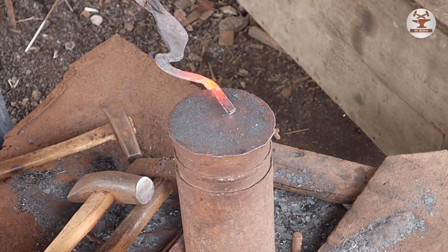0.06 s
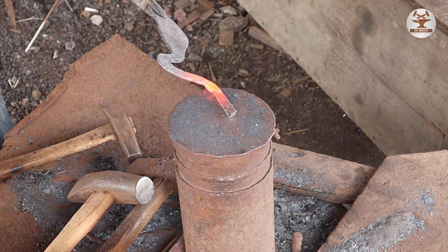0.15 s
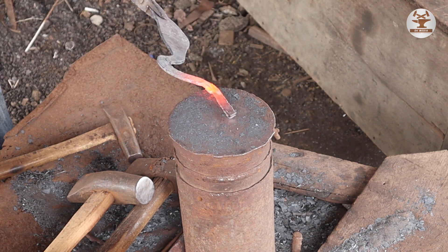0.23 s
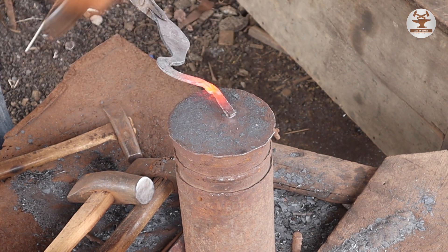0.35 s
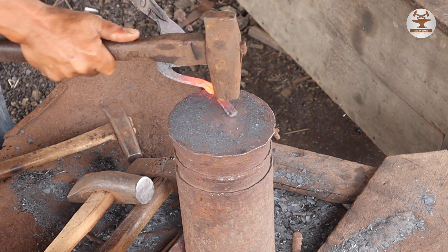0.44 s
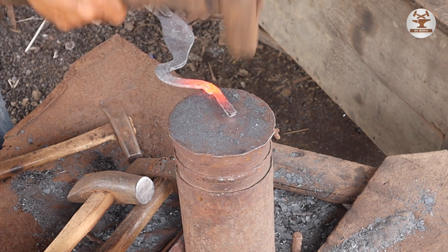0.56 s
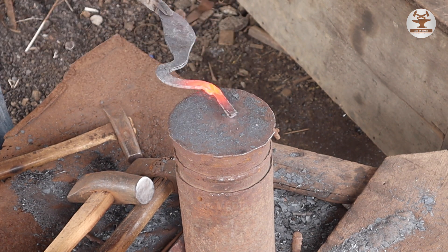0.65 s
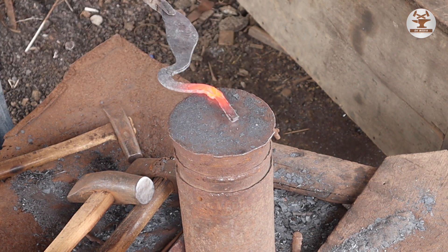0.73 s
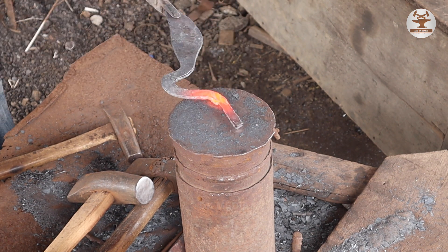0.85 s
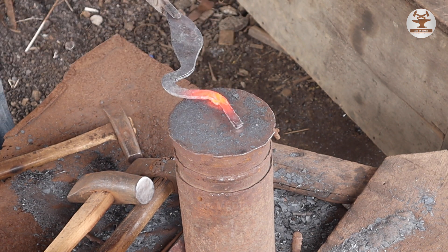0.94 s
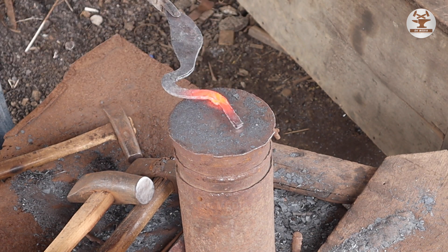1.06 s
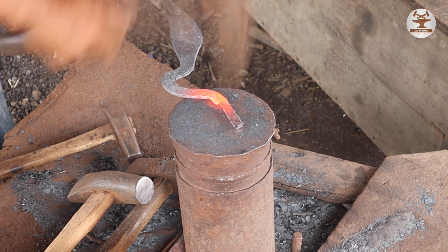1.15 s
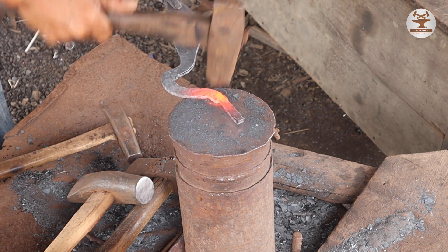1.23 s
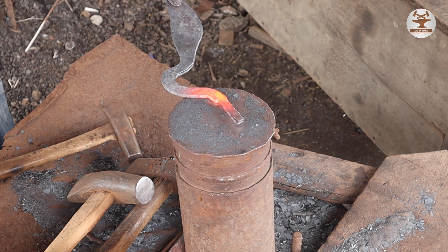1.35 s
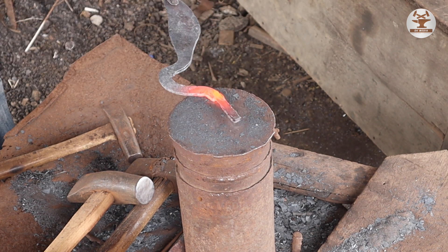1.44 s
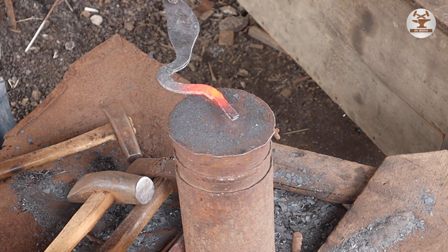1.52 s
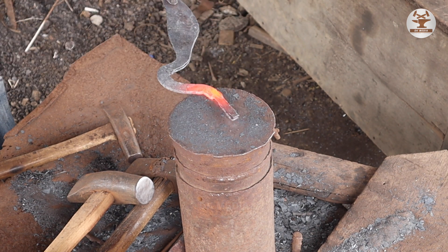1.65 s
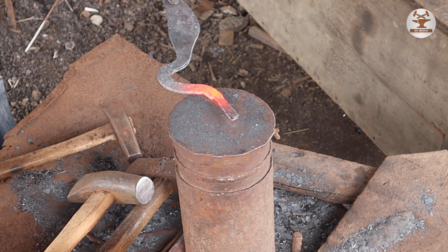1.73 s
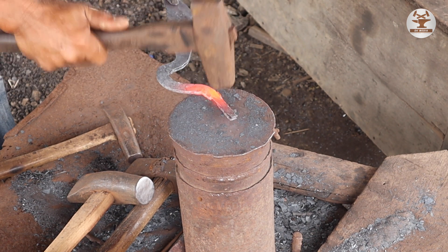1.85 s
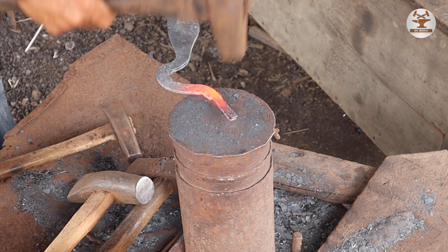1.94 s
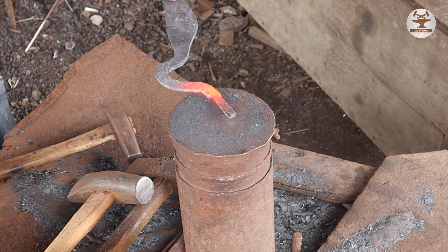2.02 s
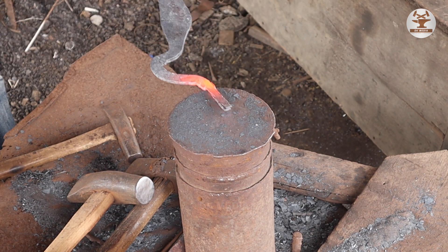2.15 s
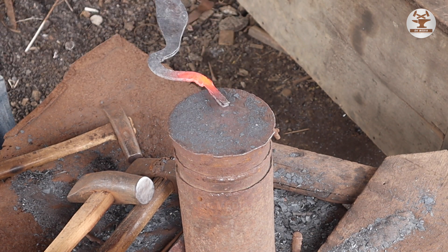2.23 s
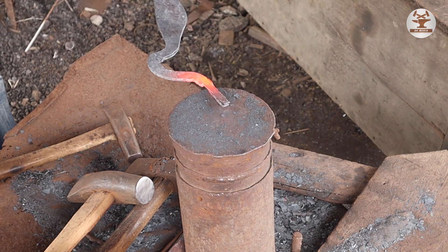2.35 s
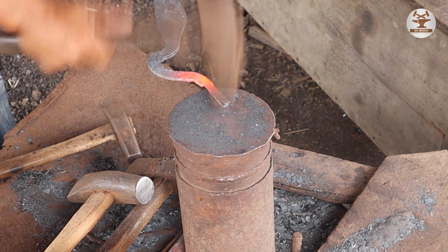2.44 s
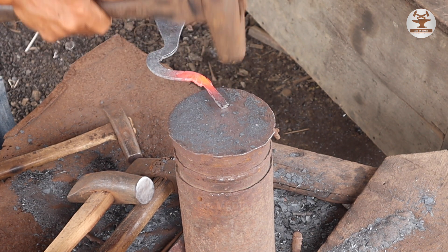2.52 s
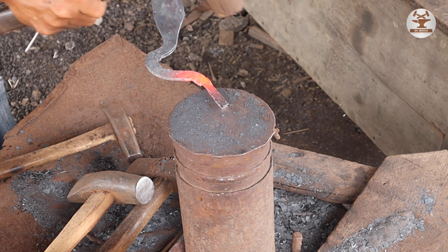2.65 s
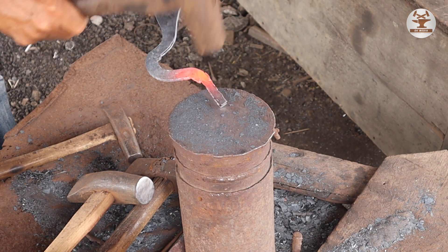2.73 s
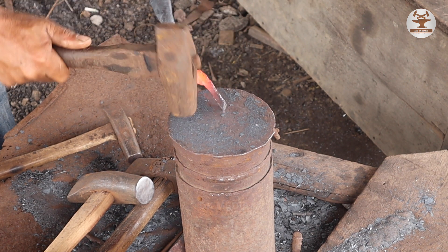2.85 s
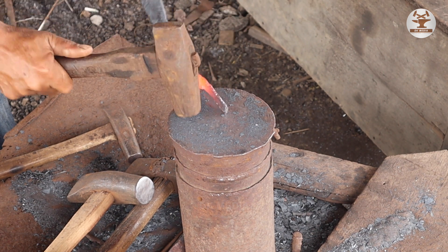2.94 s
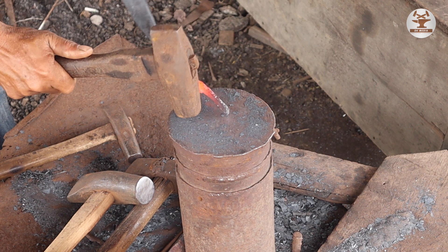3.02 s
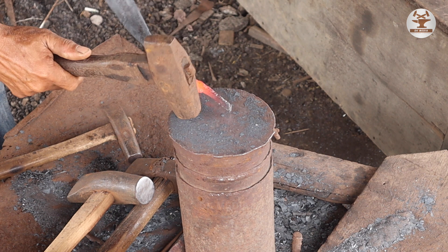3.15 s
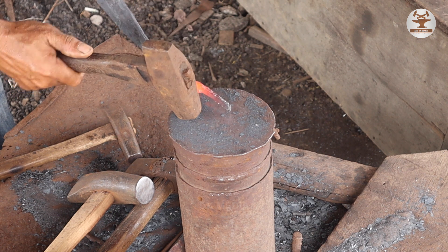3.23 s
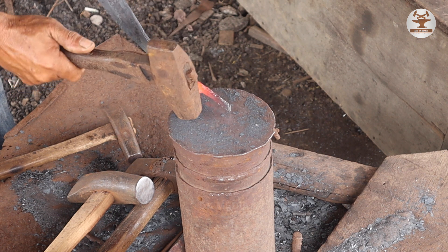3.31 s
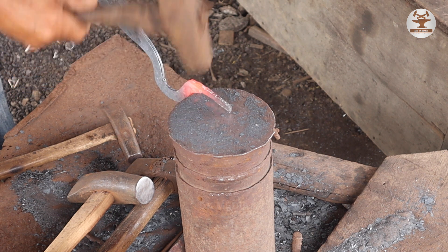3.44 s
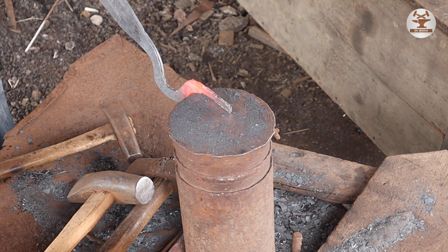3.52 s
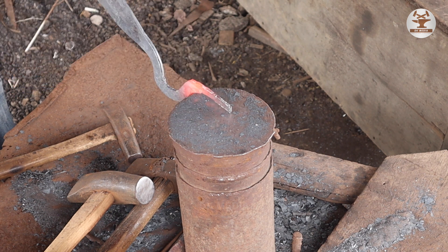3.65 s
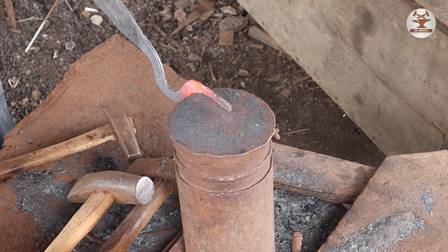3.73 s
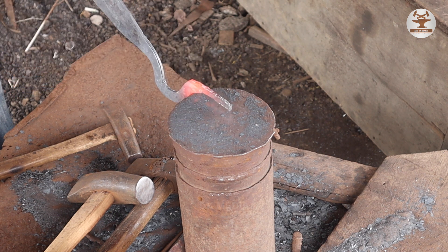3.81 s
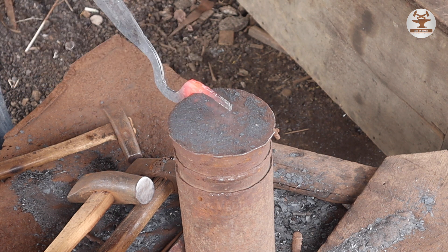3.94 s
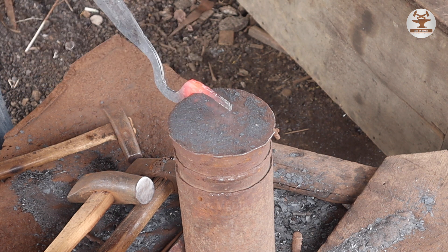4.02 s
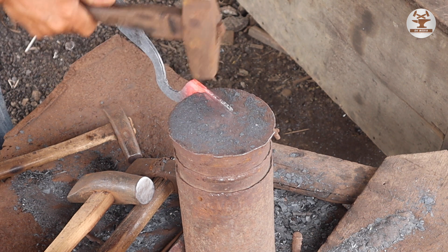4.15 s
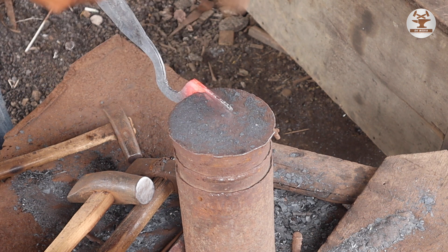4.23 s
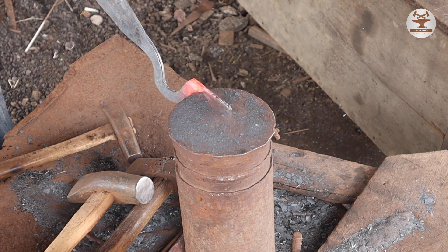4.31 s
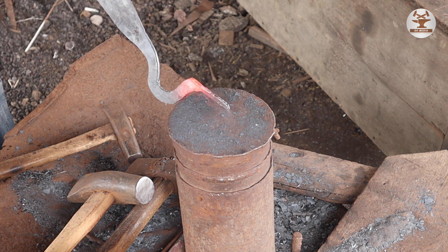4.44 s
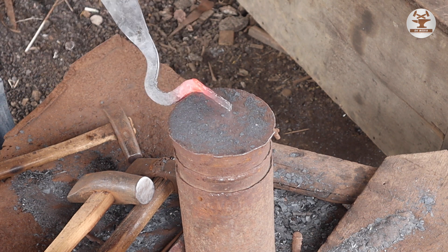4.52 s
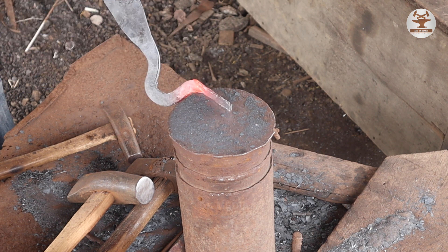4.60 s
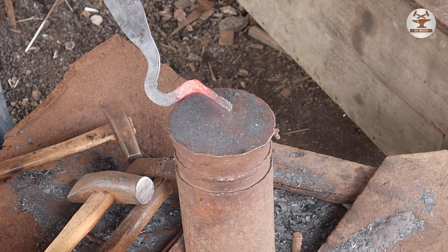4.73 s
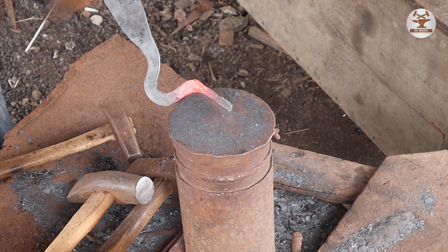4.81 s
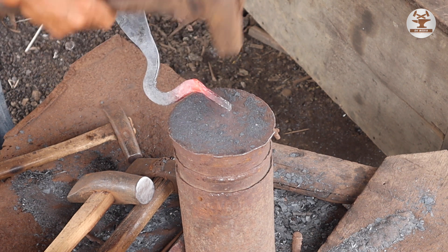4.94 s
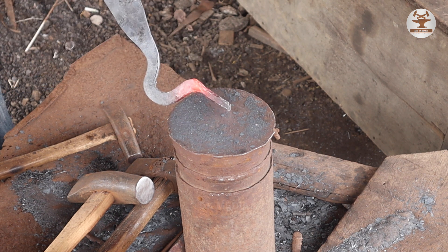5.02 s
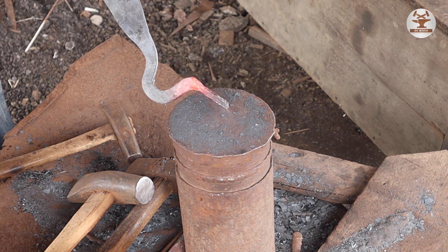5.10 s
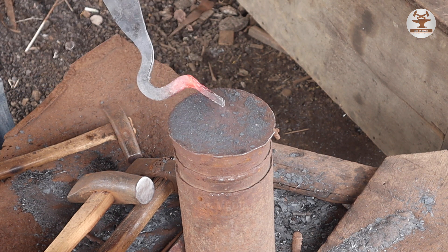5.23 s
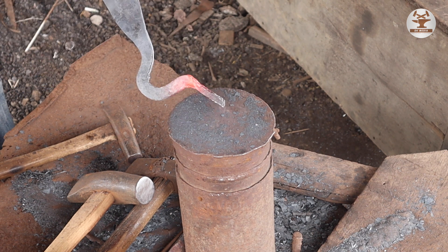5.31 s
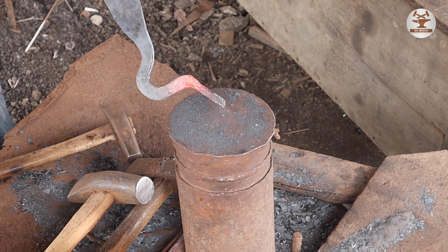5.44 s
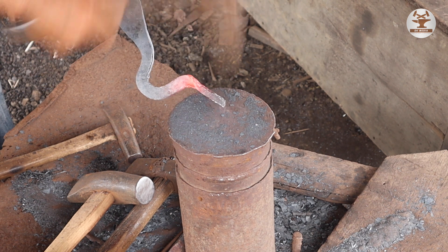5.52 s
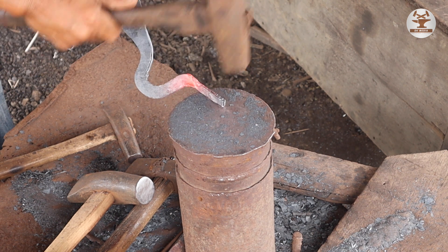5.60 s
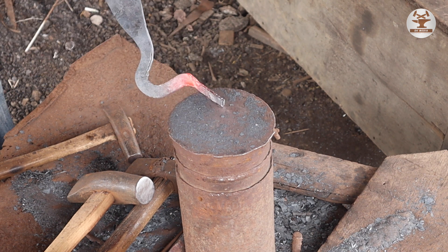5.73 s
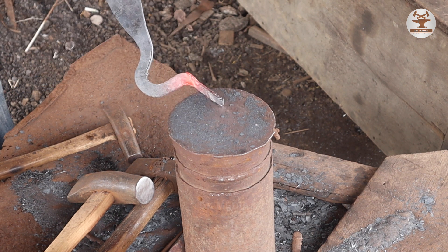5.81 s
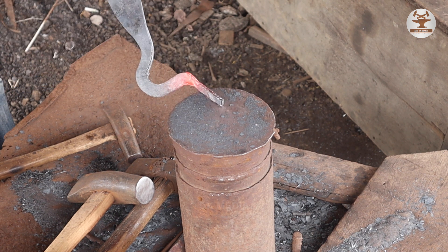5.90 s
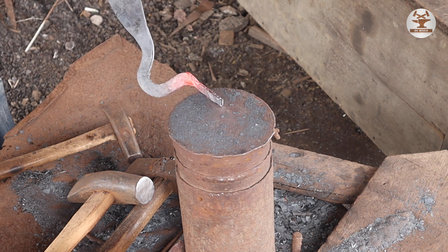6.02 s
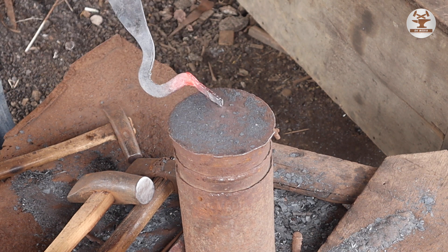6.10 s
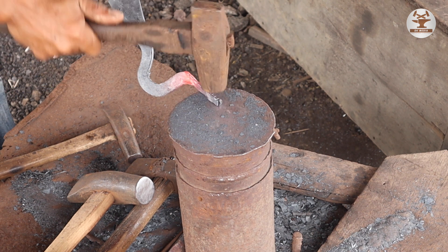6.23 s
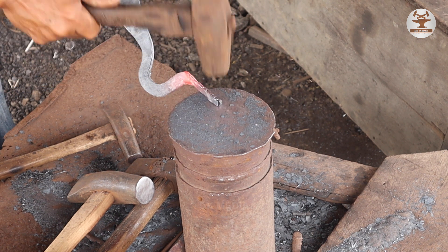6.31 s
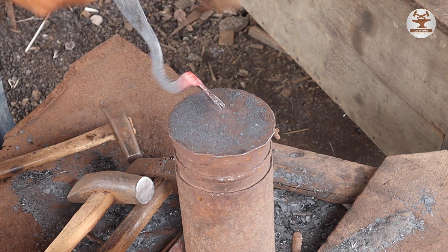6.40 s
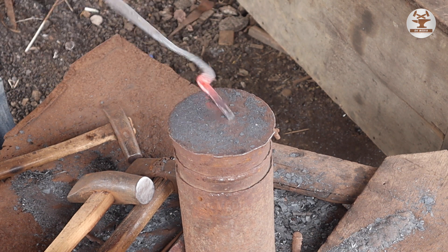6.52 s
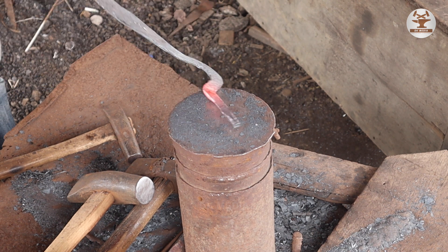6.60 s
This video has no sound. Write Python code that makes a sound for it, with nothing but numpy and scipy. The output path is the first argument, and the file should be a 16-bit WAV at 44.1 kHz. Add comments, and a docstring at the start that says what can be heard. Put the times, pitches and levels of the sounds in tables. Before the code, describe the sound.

A hand hammer strikes a hot steel bar on a small post anvil, close by under an open shed. Four blows land at about 0.5, 1.2, 1.9 and 2.5 seconds, each a crisp crack and thud. The first is fairly dull, while the later ones clank brighter and ring briefly. At 2.9 seconds the hammer drops lightly on the bare anvil and bounces in a quick, ringing double tap. After a pause, a soft, dull blow lands at 4.1 seconds, followed by firm, thudding strikes at 4.9, 5.6 and 6.2 seconds. Each has a short echo, and the loudest peaks slightly overload the microphone. A faint low rumble and hiss continue underneath. Very faint, distant animal whimpers come around 1, 4.4 and 6.4 seconds, with a bird peep at 3.6 and a barely audible howl from 5 seconds. A soft rustle comes at the end.

```python
"""A smith's hand hammer draws out a red-hot bar on a small steel post anvil under an open shed.
Each blow crushes scale, thuds the post and, where it lands hard, clanks and leaves the steel ringing;
midway the hammer drops on the bare anvil and bounces. The shed answers briefly and the loudest
peaks overload the microphone. Outside, animals call faintly over a low rumble."""
import sys
import numpy as np
from scipy import signal
from scipy.fft import rfft, irfft
from scipy.io import wavfile
from scipy.ndimage import uniform_filter1d

SR = 44100
rng = np.random.default_rng(int(sys.argv[2]) if len(sys.argv) > 2 else 0)


def digitize_waveform(pressure):
    """Quantize a signal to 16-bit integers and store it at the path in sys.argv[1].

    Rows of a 2-D input are taken as channels; values are limited to [-1, 1].
    """
    field = np.atleast_2d(pressure).T
    bounded = np.clip(field, -1, 1)
    quanta = np.round(bounded * 32767).astype(np.int16)
    wavfile.write(sys.argv[1], SR, quanta)


N = 293706
T = np.arange(SR) / SR  # one second, the life of a blow


def undb(db):
    """Decibels to gain."""
    return 10 ** (np.asarray(db) / 20)


def add(out, start_s, sound):
    """Mix a sound in from a given time."""
    start = int(round(start_s * SR))
    sound, start = sound[max(-start, 0):], max(start, 0)
    out[start:start + len(sound)] += sound[:max(len(out) - start, 0)]


def filtered(sound, order, corner_hz, kind="low"):
    """Butterworth low-pass or high-pass."""
    return signal.sosfilt(signal.butter(order, corner_hz, kind, fs=SR, output="sos"), sound)


def fade(t60_s):
    """Exponential decay, one second long."""
    return np.exp(-np.log(1000) * T / t60_s)


def ring(modes):
    """Decaying sines of a struck body; neighbouring modes swing in opposite directions."""
    return sum((-1) ** k * undb(db) * fade(t60) * np.sin(2 * np.pi * hz * T)
               for k, (hz, db, t60) in enumerate(modes))


def radiate(modes, corner_hz):
    """A struck body sends out little sound below a corner set by its size."""
    return filtered(ring(modes), 2, corner_hz, "high")


def noise(colour, size):
    """Noise of rms 1, shaped by an EQ curve."""
    hz, db = np.transpose(colour)
    freq = np.maximum(np.fft.rfftfreq(size, 1 / SR), 1)
    eq = undb(np.interp(np.log(freq), np.log(hz), db))
    shaped = irfft(rfft(rng.standard_normal(size)) * eq, size)
    return shaped / shaped.std()


def wobble(size, smooth_samples):
    """Smooth random modulation with a standard deviation of 1."""
    drift = uniform_filter1d(rng.standard_normal(size), size=smooth_samples)
    return drift / drift.std()


def tail(bands, start_s, rise_s):
    """Diffuse reverb: half-octave bands of noise, each dying at its own rate."""
    hz, db, t60 = np.transpose(bands)
    freq, white = np.fft.rfftfreq(SR, 1 / SR), rfft(rng.standard_normal(SR))
    onset = np.clip((T - start_s) / rise_s, 0, 1)
    out = 0
    for low_hz in 45 * 2 ** np.arange(0, 8.6, .5):
        inside = (freq >= low_hz) & (freq < low_hz * np.sqrt(2))
        log_centre = np.log(freq[inside].mean())
        band_db, band_t60 = (np.interp(log_centre, np.log(hz), column) for column in (db, t60))
        band = irfft(white * inside, SR) * onset * fade(band_t60)
        out = out + band * undb(band_db) * np.sqrt(inside.mean() / np.sum(band ** 2))
    return out


def outdoors(level_db=-67, swell_db=3.2953):
    """The bed: faint hiss and a distant rumble that swells slowly."""
    # colour of the open air: freq_hz, level_db
    air_colour = [(15, -51), (25, -18), (69, 6.5), (107, -12), (140, 2), (193, -11.5), (260, -7.5),
                  (331, -17), (433, -16), (895, -20), (997, -21), (1340, -25.5), (1490, -25), (1750, -28),
                  (15500, -34)]
    swell = np.interp(np.arange(N), np.linspace(0, N, 24), rng.standard_normal(24))
    air = undb(level_db) * noise(air_colour, N)
    rumble = filtered(air, 2, 600)
    return air + rumble * (undb(swell_db * swell) - 1)


def call(length_s, aim_hz, partials_db, scoop=0, scoop_s=1, sag_hz_per_s=0,
         waver=.012, attack_s=.0057, release_s=.015):
    """An animal's wavering tone: it starts a share (scoop) below the pitch it aims at, and may sag."""
    t = np.arange(int(length_s * SR)) / SR
    pitch_hz = aim_hz * (1 - scoop * np.exp(-t / scoop_s)) - sag_hz_per_s * t
    pitch_hz *= 1 + waver * wobble(len(t), 300)
    phase = 2 * np.pi * np.cumsum(pitch_hz) / SR
    tone = sum(undb(db) * np.sin(k * phase) for k, db in enumerate(partials_db, 1))
    envelope = np.minimum(t / attack_s, 1) * np.minimum((length_s - t) / release_s, 1)
    return np.sqrt(2) * tone * envelope


def animals(hoarse_db=4.5):
    """Far whimpers, two bird notes and a long, hoarse falling howl, blurred by the yard."""
    # a small animal whimpering some way off: start_s, length_s, level_db
    whimpers = [(.705, 0.0407, -69), (.802, 0.0444, -68), (.872, 0.0354, -68), (.952, 0.105, -68),
                (1.125, 0.075, -70.5), (4.232, .05, -73.5), (4.298, 0.0368, -69), (4.379, 0.11, -68.5),
                (4.537, 0.0965, -69.5), (6.38, .05, -71), (6.465, 0.099, -71)]
    out = np.zeros(N)
    for start_s, length_s, level_db in whimpers:
        yelp = call(length_s, 1365.4, [-1.5], scoop=.5, scoop_s=.013, sag_hz_per_s=3300)
        add(out, start_s, undb(level_db) * yelp * fade(.8)[:len(yelp)])
    peep = call(.1497, 1334, [-25.5, -19, -.5, -21], scoop=.14, scoop_s=.02, sag_hz_per_s=440,
                waver=.006, attack_s=.0419, release_s=.0836)
    chirp = call(.032, 9800, [-1.5], scoop=.45, scoop_s=.054, attack_s=.012)
    howl = call(1.55, 847.6, [-1.5, -1], sag_hz_per_s=100, waver=.02, attack_s=.0774, release_s=.1076)
    howl *= undb(hoarse_db * wobble(len(howl), 1500))
    for start_s, level_db, sound in [(.32, -75, chirp), (3.64, -67.5, peep), (5.08, -82, howl)]:
        add(out, start_s, undb(level_db) * sound)
    yard_blur = tail([(491, -6, .35), (7060, -6.5, .19)], start_s=.0052, rise_s=.012)
    return out + signal.fftconvolve(out, yard_blur)[:N]


def shed():
    """Impulse response of the shed: direct sound, first echoes, resonances, scatter and the yard."""
    # short scatter under the roof, against the direct sound: freq_hz, level_db, t60_s
    scatter = [(101, -16.5, 0.28), (296, -11, 0.37), (680, -10, 0.15), (1506, -11.5, 0.19),
               (3500, -10.5, .14), (7000, -8.5, 0.14), (15000, -11, .12)]
    # late reverb from the yard, against the direct sound: freq_hz, level_db, t60_s
    yard = [(100, -19, 0.948), (306.5, -21.5, 1), (710, -29.5, 0.67), (1520, -36.5, 0.38),
            (3500, -35.5, 0.4), (6966, -41, 0.52), (14779, -50.5, .3)]
    # first echoes off the ground and boards: delay_s, level_db
    echoes = [(.0024, -11.5), (0.0124, -13.5), (0.014, -12.5), (0.0196, -19), (.043, -22)]
    # resonances of the shed and the boards around the anvil: pitch_hz, peak_gain_db, t60_s
    shed_modes = [(152, -8, 0.14), (202, -6.5, 0.28), (249.9, -0.5, 0.6), (324.1, -3.5, 0.16),
                  (357.7, -6, 0.46), (367.8, 1, 0.15), (422.4, -4.5, 0.21), (482, -8, 0.11),
                  (540, -3, 0.14), (609.8, -7, 0.16), (697, -5, 0.3), (779.7, 4, 0.11), (841.7, 0, 0.18),
                  (935.7, -2, 0.2), (995.6, -3, 0.21), (1071, -5, 0.061)]
    out = tail(scatter, start_s=.0018, rise_s=.0022) + tail(yard, start_s=.0089, rise_s=.017)
    out[0] += 1  # direct sound
    dull_echo = filtered(signal.unit_impulse(SR), 1, 1600)  # rough boards and earth soak up treble
    for delay_s, level_db in echoes:
        add(out, delay_s, undb(level_db) * dull_echo)
    # a longer ring needs less drive to reach the same gain
    resonances = sum(ring([(hz, db, t60)]) * 2 * np.log(1000) / (t60 * SR) for hz, db, t60 in shed_modes)
    add(out, .0105, resonances)
    return out


def rustles():
    """Faint noise: the fading tail of an earlier blow, a brief rustle between blows, two at the end."""
    # short swells of noise: start_s, length_s, level_db
    swells = [(-.12, 0.272, -63), (2.083, 0.124, -67), (6.521, 0.125, -70.5), (6.606, 0.0483, -54.5)]
    # their dull colour: freq_hz, level_db
    colour = [(150, 3), (350, 8), (1000, -2.5), (2500, -8.5), (4000, -9.5), (7000, -37.5), (15000, -27.5)]
    out = np.zeros(N)
    for start_s, length_s, level_db in swells:
        size = int(length_s * SR)
        add(out, start_s, undb(level_db) * np.hanning(size) * noise(colour, size))
    return out


def bar_chatter(rise_s=.0045):
    """The loose bar chatters on the face once the hammer lifts, then settles with a duller rattle."""
    # colour of steel rattling on steel: freq_hz, level_db
    chatter_colour = [(300, -10), (900, -0.5), (1700, 2), (3000, -5.5), (3800, -2), (5000, -15.5),
                      (6800, -13), (9000, -29), (15000, -35)]
    rattle = noise(chatter_colour, SR) * np.minimum(T / rise_s, 1)
    settling = filtered(rattle, 4, 4400)
    return undb(3) * rattle * fade(.21) + undb(-13) * settling * fade(.6)


def bar_ring(width_hz=26):
    """The loose bar rings; every touch on the face jogs the phase of each mode and broadens it."""
    # the bar's free modes after the rebound: pitch_hz, level_db, t60_s
    bar_modes = [(1012, -3, 0.25), (1450, -2.5, 0.16), (1580, -3, 0.16), (2070, -0.5, 0.13),
                 (2783, -7.5, .2), (3608, 1, 0.24), (3770, -3.5, 0.42), (3830, -5, 0.3)]
    steps = rng.standard_normal((len(bar_modes), SR))
    jogs = np.cumsum(steps, axis=1) * np.sqrt(2 * np.pi * width_hz / SR)
    return sum(undb(db) * fade(t60) * np.sin(2 * np.pi * hz * T + jog)
               for (hz, db, t60), jog in zip(bar_modes, jogs))


def scale_crack(yield_s):
    """Scale crushes in a bright burst that lasts longer the longer the hot steel yields."""
    # colour of cracking scale: freq_hz, level_db
    scale_colour = [(200, -24), (1000, -5), (1800, -6.5), (2400, -0.5), (3000, -3.5), (3550, 3.5),
                    (4200, 0), (6500, -10), (9000, -10.5), (11000, -16.5), (15500, -16)]
    return noise(scale_colour, SR) * fade(.013 + 6 * yield_s) * np.minimum(T / yield_s, 1)


def post_thud(push_s):
    """The post takes a bell-shaped push; the longer the push, the duller the thud."""
    # the anvil post under the bar: pitch_hz, level_db, t60_s
    post_modes = [(408.3, -6, 0.016), (568, -1.5, .015), (848, -3.5, .013), (1035, -5, .013)]
    force = np.exp(-(4 * T[:SR // 100] / push_s - 2) ** 2)
    return signal.fftconvolve(radiate(post_modes, corner_hz=260), force / force.sum())[:SR]


def blow(force_db, yield_s, scale_db, bar_db, head_db, usual_yield_s=.0005):
    """Scale cracks while the hot steel yields; then the force reaches the anvil, and the steel rings."""
    # the post's footing in the earth: pitch_hz, level_db, t60_s
    ground_modes = [(114, -15, 0.014), (210.8, 8.5, .035), (378, 1.5, 0.04)]
    # hammer and anvil face while pressed together: pitch_hz, level_db, t60_s
    face_modes = [(1288, -9, 0.013), (1510.9, 0, 0.011), (1817.6, -4, 0.015), (2131.3, -7.5, .013),
                  (2497, -10.5, 0.015), (2795, -10, 0.0077), (3763, -14.5, 0.0041), (5048, -19.5, 0.0078),
                  (6760, -21.5, .008)]
    # the hardened hammer head: pitch_hz, level_db, t60_s
    head_modes = [(6626, 0, 0.089), (6740, -2, 0.13), (6793, -3.5, .14), (9543, -7, .13),
                  (9680, -13.5, .13), (12370, -22, .13)]
    # a soft bar stretches the push: each doubling of the yield time adds thump and takes clank and ring
    softness = np.log2(yield_s / usual_yield_s)
    out = undb(scale_db) * scale_crack(yield_s)
    thump = undb(-25.5 + 4 * softness) * radiate(ground_modes, corner_hz=86.74)
    thud = post_thud(push_s=.45 * yield_s)
    clank = undb(-3.5 - 7 * softness) * radiate(face_modes, corner_hz=796)
    bar = bar_chatter() + undb(-16.5 - 3 * softness) * bar_ring()
    head = undb(head_db) * ring(head_modes)
    add(out, yield_s, thump + thud + clank + undb(bar_db) * bar + head)
    return undb(force_db) * out


def anvil_tap(force_db):
    """A light, hard stroke on the bare face lets anvil and hammer ring."""
    # the anvil with no bar to damp it: pitch_hz, level_db, t60_s
    anvil_modes = [(378.6, -11.5, 0.14), (804.3, -3, .15), (900, -3.5, 0.11), (1013.7, 7, 0.074),
                   (2220, -6, 0.11), (3032.6, -3, 0.034), (3612, 4, .05), (6862, -11.5, 0.047)]
    hit = blow(force_db, yield_s=.0003027, scale_db=-21, bar_db=-33.5, head_db=-33.5)
    return hit + undb(force_db - 20.5) * ring(anvil_modes)


def hammering():
    """Two runs of four blows on the hot bar, with a bouncing tap on the anvil between them."""
    # hammer blows: start_s, force_db, yield_s, scale_db, bar_db, head_db (the last three ride on force)
    blows = [(0.4686, -6, .0006, -13.5, -50, -62.5), (1.1957, -5, 0.000314, -14, -41, -52.5),
             (1.8912, -7, 0.0002094, -9.5, -29.5, -41.5), (2.4927, -8, 0.0002003, -7, -28, -30.5),
             (4.1007, -7, .0017, -10, -48, -61.5), (4.898, -5, .0006, -16, -52, -60),
             (5.5701, -3.5, .00068, -19.5, -52.5, -61.5), (6.2375, -5, 0.000675, -18, -54.5, -62)]
    # the hammer dropped on the bare anvil, and its bounce: start_s, force_db
    taps = [(2.9067, -12), (2.9677, -17.5)]
    out = np.zeros(N)
    for start_s, *stroke in blows:
        add(out, start_s, blow(*stroke))
    for start_s, force_db in taps:
        add(out, start_s, anvil_tap(force_db))
    return out


def scene():
    """The anvil work in its shed, over the sounds outside, in mono."""
    forge = signal.fftconvolve(hammering() + rustles(), shed())[:N]
    return (forge + animals() + outdoors())[None]


def record(dry, ceiling=.54, top_hz=15900):
    """The microphone soft-clips the highest peaks, and a steep low-pass cuts the top."""
    clipped = dry / (1 + (dry / ceiling) ** 8) ** (1 / 8)
    return signal.sosfilt(signal.ellip(10, .2, 80, top_hz, fs=SR, output="sos"), clipped)


dry = scene()
out = record(dry)
digitize_waveform(out)
```